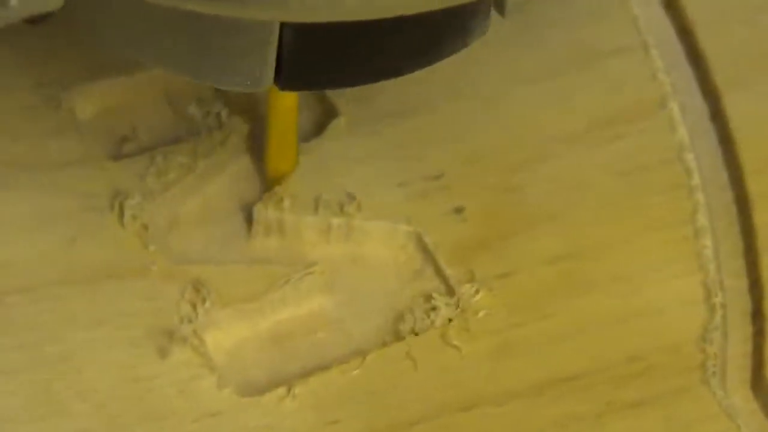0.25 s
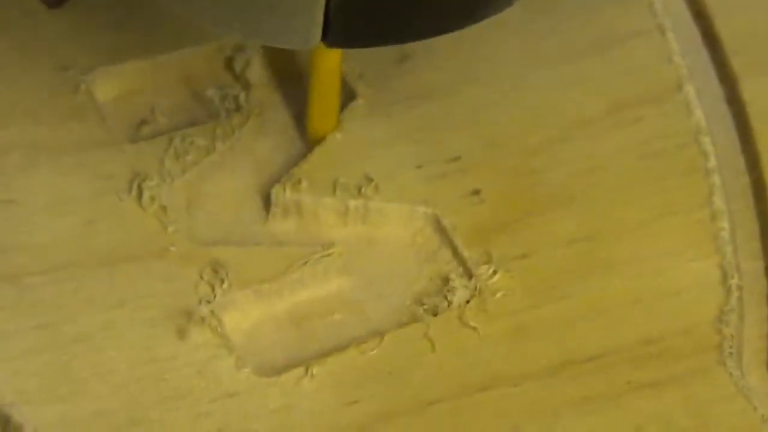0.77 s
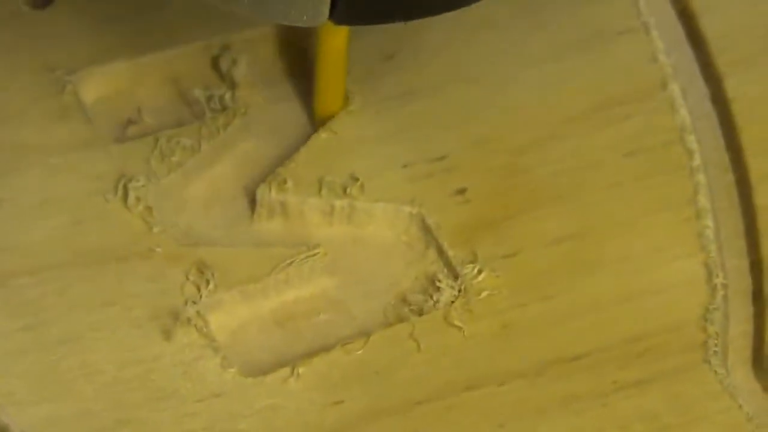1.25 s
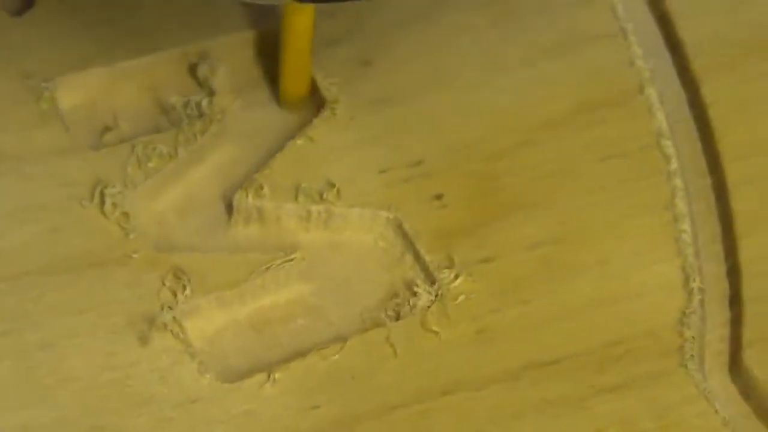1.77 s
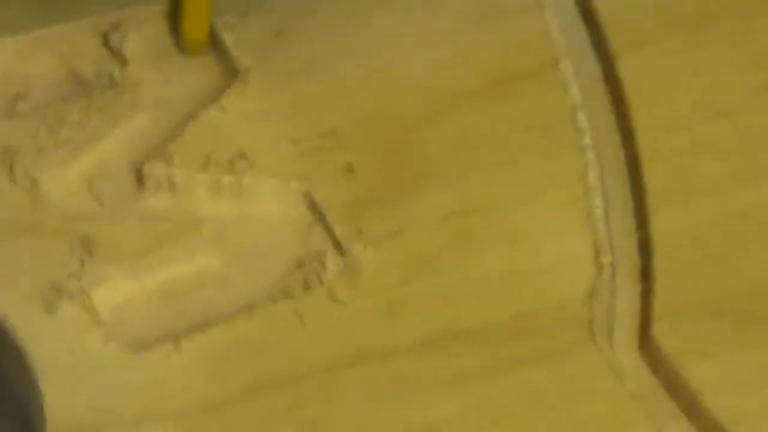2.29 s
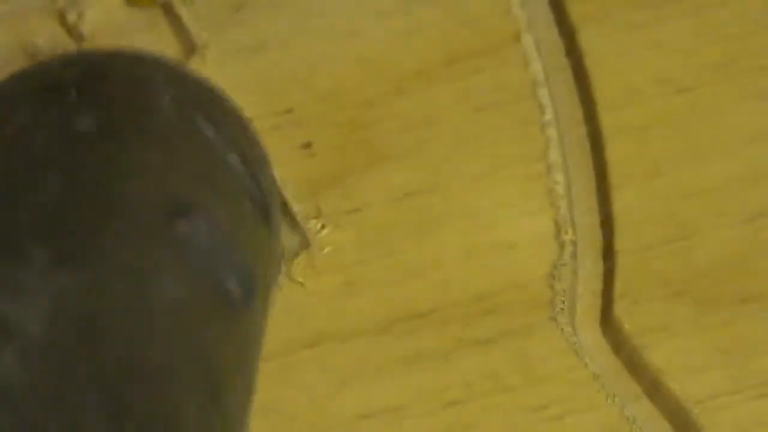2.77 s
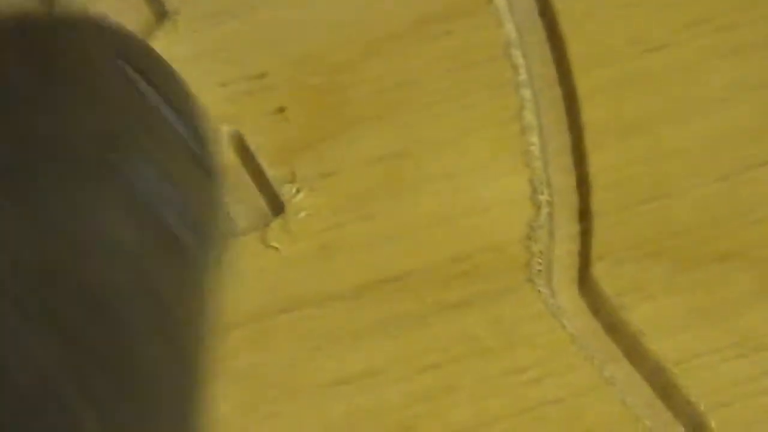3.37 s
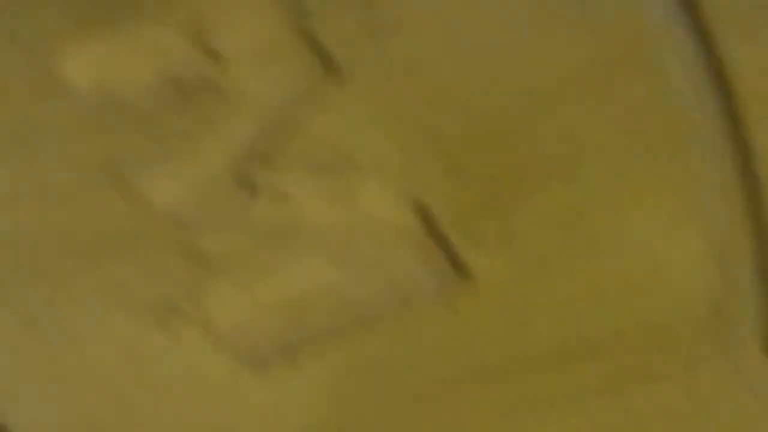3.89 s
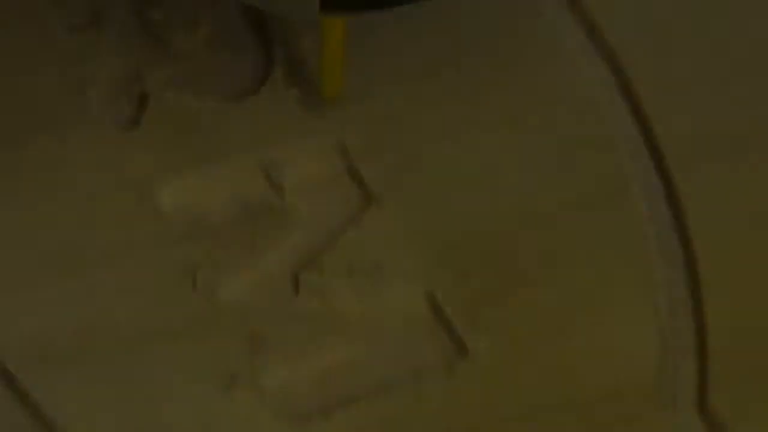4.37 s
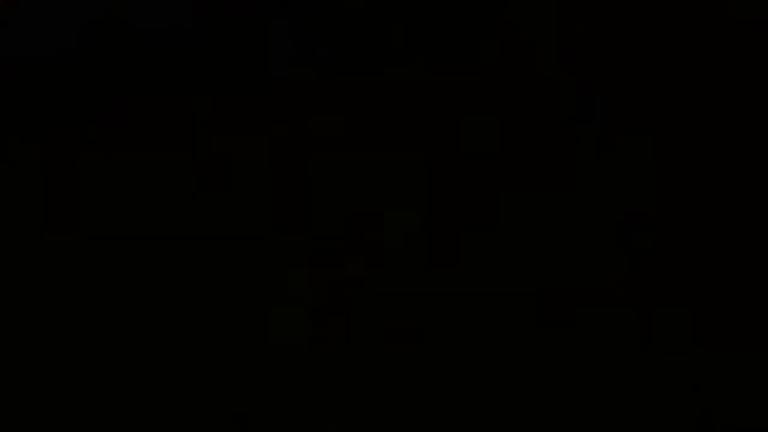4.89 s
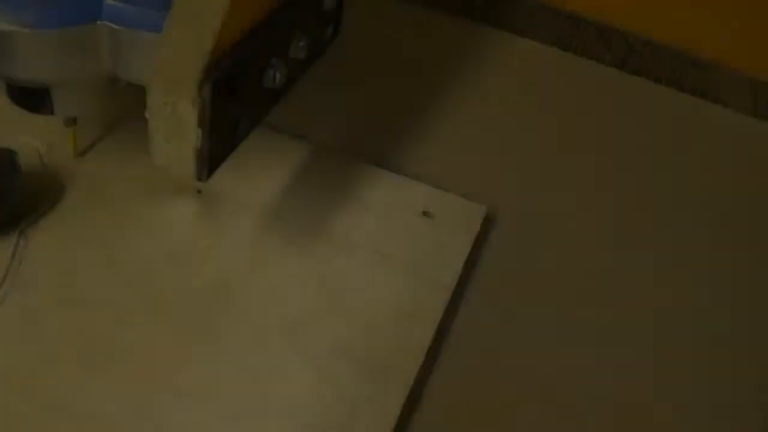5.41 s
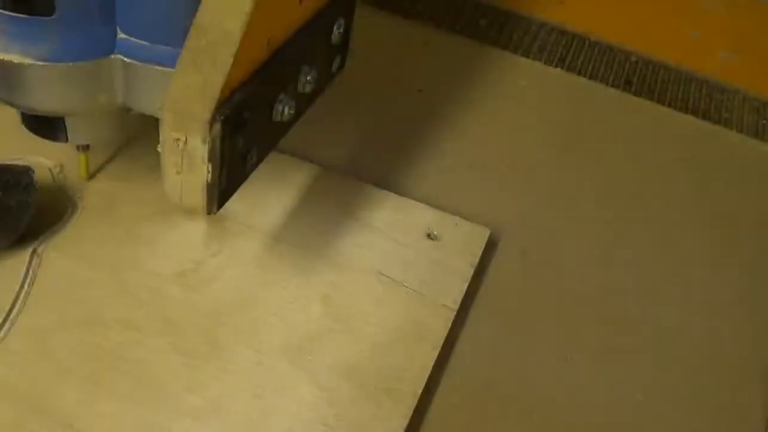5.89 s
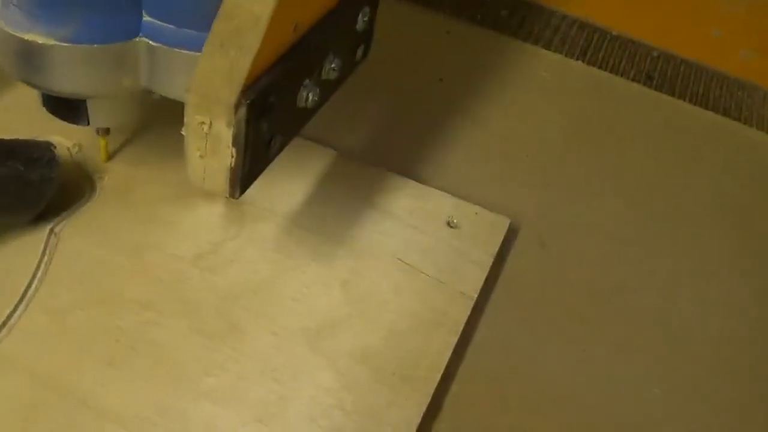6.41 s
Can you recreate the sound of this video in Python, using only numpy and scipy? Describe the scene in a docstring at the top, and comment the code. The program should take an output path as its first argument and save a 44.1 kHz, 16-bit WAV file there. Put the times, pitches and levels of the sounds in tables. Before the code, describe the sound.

Heard up close, a small milling machine carves wood: a high motor whine, a buzzing squeal from the bit and the hiss of suction. The squeal grows rough and uneven, then drops away near the middle while the motor rises slightly in pitch. The whine and hiss fade out briefly, return, and the cutting starts again just before the end.

```python
"""First comes the whine of a router spindle, close to the microphone, its bit already cutting wood on a
small milling table. The motor fan roars and sings at 27 times the shaft speed, the flutes strike out
harmonics of the shaft, and a suction nozzle whistles near the work. The bit chatters after a corner and
lifts out near 3 s; the microphone draws back. All fades to silence at 5 s and returns from a second
microphone position, where the bit meets the wood again."""
import sys
import numpy as np
from scipy import signal
from scipy.io import wavfile
from scipy.ndimage import uniform_filter1d

SR = 44100
rng = np.random.default_rng(int(sys.argv[2]) if len(sys.argv) > 2 else 0)


def wav_out(sig):
    """Save sig, one row per channel (or a flat mono array), as 16-bit PCM at SR to the path in sys.argv[1]."""
    wavfile.write(sys.argv[1], SR, np.round(np.clip(np.atleast_2d(sig).T, -1, 1) * 32767).astype(np.int16))


N = 293250
TIME = np.arange(N) / SR
CORNER_S, CHATTER_END_S = 1.36, 2.5
PULL_BACK_S, MOVE_S = 3.82, 5.006  # the microphone draws back, then takes its second position
SIDE = np.array([[.5], [-.5]])  # splits a left-minus-right difference between the channels


def gain_of(db):
    """Decibels to amplitude."""
    return 10 ** (np.asarray(db) / 20)


def unit_rms(x):
    """Scales to rms 1."""
    return x / np.sqrt(np.mean(abs(x) ** 2) + 1e-20)


def spectrum_at(points, hz):
    """Reads a spectrum on a log-frequency axis."""
    point_hz, value = np.transpose(points)
    return np.interp(np.log(hz + 1), np.log(point_hz + 1), value)


def curves(rows, t=TIME):
    """Every column of a table, interpolated at the times t."""
    times, *columns = np.transpose(rows)
    return [np.interp(t, times, column) for column in columns]


def held(rows, blend_s=0.03):
    """Every column of a table, held from one start to the next and blended at the change."""
    starts, *columns = np.transpose(rows)
    row = np.maximum(np.searchsorted(starts, TIME, "right") - 1, 0)
    return uniform_filter1d(np.array(columns)[:, row], round(blend_s * SR), axis=1, mode="nearest")


def bumps(rows):
    """Sum of flat-topped bumps (time [s], length [s], height)."""
    return sum(height * np.exp(-(2 * (TIME - s) / length) ** 4) for s, length, height in rows)


def wander(hz):
    """Slow random motion up to about hz, rms 1."""
    points = rng.standard_normal(int(N / SR * 200) + 2)
    smooth = signal.lfilter(*signal.butter(2, min(hz, 90), fs=200), points)
    return np.interp(TIME * 200, np.arange(len(points)), unit_rms(smooth))


# Standing waves at the microphone: (frequency [Hz], left minus right [dB], left phase lead [rad])
STANDING_WAVES = [(470, -3, -0.46), (930, 1, 0.65), (1400, -2, -0.82), (2800, 0, 0.098),
                  (3750, -1.5, -0.0044), (4680, -2, 0.81), (5150, -0.5, 0.52), (5570, -0.5, 0.52),
                  (7000, 3, 0.74), (12700, -0.4, -0.31)]


def tone(cycles, db, hz):
    """A sine of rms level db at a swaying hand-held stereo microphone; hz sets its place in the image."""
    wave_hz, lean_db, lead = np.transpose(STANDING_WAVES)
    phase = 2 * np.pi * (cycles + rng.random())
    phase = phase + SIDE * (np.interp(hz, wave_hz, lead) + 0.29 * wander(3.8))
    balance_db = np.interp(hz, wave_hz, lean_db) + 1.3 * wander(1.8)
    return np.sqrt(2) * gain_of(db + SIDE * balance_db) * np.cos(phase)


# The motor at the microphone: (time [s], fan whine [dB], next order up [dB], shaft hum [dB])
MOTOR_LEVELS = [(0.0, -41, -68, -66), (0.375, -37.5, -62, -61), (0.5, -40.5, -65, -63.5),
                (0.65, -36.5, -69, -61), (0.9, -36.5, -69, -60), (1.2, -38.5, -65, -59),
                (1.3, -36, -65, -57), (1.375, -44, -63.5, -64.5), (1.5, -36.5, -64.5, -59),
                (1.7, -43.5, -58, -60.5), (1.9, -47, -58, -63), (1.97, -41, -59, -68),
                (2.05, -35.5, -61, -66), (2.18, -41, -63, -70), (2.3, -39.5, -64, -73),
                (2.55, -32, -60, -73), (2.75, -38, -54, -65), (2.95, -34.5, -62, -60.5),
                (3.3, -33, -71, -59.5), (3.55, -40.5, -57, -53), (3.9, -39.5, -60, -57.5),
                (4.3, -47.5, -53, -57.5), (4.8, -38.5, -52, -58.5), (5.15, -37, -46.5, -54),
                (5.3, -34, -45, -55), (5.6, -33.5, -48, -55), (5.78, -38.5, -42, -54),
                (5.9, -36.5, -45, -58), (6.0, -35, -48, -61), (6.1, -35.5, -47, -55),
                (6.25, -34, -47, -57.5), (6.5, -36, -46.5, -53.5), (6.56, -38, -47, -58),
                (6.65, -41, -47.5, -52)]
# Faint motor tones that never stop: (order [x shaft speed], level [dB])
FAINT_ORDERS = [(3, -60), (21, -62), (22, -62), (23, -63), (24, -62), (25, -61), (26, -61), (29, -68)]
FAN_BLADES = 27
RIPPLE_HZ, RIPPLE_DEPTH = 100, .07  # torque ripple at twice the mains frequency


def motor(turns, shaft_hz):
    """The fan blades whine, shaken by torque ripple, over the hum of the unbalanced shaft."""
    whine_db, upper_db, hum_db = curves(MOTOR_LEVELS)
    blade_hz = FAN_BLADES * shaft_hz
    whine = tone(FAN_BLADES * turns + 0.025 * wander(12), whine_db + 0.8 * wander(40), blade_hz)
    whine *= 1 + RIPPLE_DEPTH * np.cos(2 * np.pi * RIPPLE_HZ * TIME + 1.2 * wander(25))
    upper = tone((FAN_BLADES + 1) * turns, upper_db + 1.5 * wander(12), blade_hz)
    hum = tone(turns, hum_db + 1.1 * wander(11), shaft_hz)
    faint = sum(tone(k * turns, db + 3.4 * wander(2.7), k * shaft_hz) for k, db in FAINT_ORDERS)
    return whine + upper + hum + faint


# Each leg of the tool path meets the wood its own way, in eight registers: (start [s], flute beat [dB],
# board drone [dB], lower ring [dB], 10th order [dB], 11th [dB], bit ring [dB], upper ring [dB], 15th [dB])
PATH_LEGS = [(0.0, -45.5, -47, -42, -63, -48, -40, -54, -50),
             (0.34, -45, -46.5, -45, -49, -46, -42, -40, -46),
             (0.45, -49.5, -46.5, -45, -50, -42, -39, -47, -51),
             (0.66, -47.5, -48, -47, -59, -45, -39, -51, -53),
             (0.98, -48, -47, -45.5, -54, -44, -38, -48, -51),
             (1.2, -47, -46.5, -50, -58, -44.5, -41, -42, -49),
             (1.34, -56.5, -56, -48, -46, -43, -37.5, -37.5, -46),
             (1.45, -59, -47.5, -42.5, -46.5, -50, -41.5, -47, -48),
             (1.64, -59, -47, -44.5, -46.5, -50, -41.5, -44, -46.5),
             (2.0, -58, -47.5, -46, -45.5, -49.5, -42, -48, -50),
             (2.17, -56, -45.5, -43.5, -40, -44, -39.5, -48, -50),
             (2.27, -58, -47.5, -43.5, -45, -40.5, -38.5, -50, -60),
             (2.35, -67, -52, -56, -45, -52, -42, -53, -58),
             (2.41, -61, -45.5, -56, -52, -44, -44, -53, -58),
             (2.48, -65, -48.5, -51, -53, -54, -48, -56, -56),
             (2.6, -67, -52, -51, -43.5, -52, -45, -55, -60),
             (2.68, -65, -58, -60, -60, -62, -52, -62, -66),
             (2.715, -61, -55, -61, -45.5, -47, -41.5, -59, -46),
             (2.8, -58, -50, -57, -45, -50, -50, -62, -62), (2.86, -71, -60, -60, -60, -70, -51, -70, -70),
             (2.97, -66, -56.5, -58, -72, -66, -84, -71, -82),
             (6.09, -62, -67, -64, -60, -52, -49, -50, -61),
             (6.32, -77, -56, -62, -54, -49, -56, -48.5, -60),
             (6.53, -69, -52, -57, -59, -52, -42.5, -41, -55),
             (6.6, -57, -47, -45, -52.5, -51, -51, -48, -58)]
# Harmonics of the cut: (order [x shaft speed], register [index], share along the first edge [dB],
# share after the corner [dB], share at the second position [dB])
CUT_HARMONICS = [(2, 0, 0, 0, 0), (4, 1, -10, -14, -7), (5, 1, -10, -12, -12), (6, 1, -5, -7, -10),
                 (7, 1, -7, -1, -7), (8, 2, -1, -2, -1), (9, 2, -8.5, -4, -6), (10, 3, 0, 0, 0),
                 (11, 4, 0, 0, 0), (12, 5, 0, 0, 0), (13, 6, -11, -8, -9), (14, 6, -7, -6, -2),
                 (15, 7, 0, 0, 0), (16, 6, -11, -12, -12), (17, 6, -12, -14, -10)]
# At turns the contact slips round the bit and the cut sounds flat: (time [s], length [s], rate drop [Hz])
CONTACT_SLIPS = [(1.31, .03, 2), (1.362, .045, 5.2), (1.405, .02, 4), (1.45, .07, 1.5), (6.297, .025, 3.5),
                 (6.553, .04, 3.5)]
# The bit skips or digs in: (time [s], length [s], squeal change before weighting by order [dB])
SKIPS_AND_DIGS = [(.39, .04, -5), (.51, .08, 2.5), (1.2, .02, -5), (1.25, .045, -4), (1.32, .03, -3),
                  (1.475, .012, 4), (1.495, .014, -6), (1.52, .01, -9), (1.54, .025, 2), (1.56, .01, -11),
                  (1.585, .035, 7), (1.61, .008, -9), (1.625, .018, 6), (1.645, .014, -5),
                  (1.695, .016, -7), (1.73, .03, 7), (1.755, .012, -6), (1.765, .01, 3), (1.78, .018, -6),
                  (1.805, .018, 5), (1.83, .02, 3), (1.875, .03, -5), (1.965, .012, -6), (2.0, .025, 4),
                  (2.025, .012, -6), (2.055, .01, -5), (2.08, .02, -6), (2.11, .04, 4), (2.14, .02, -9),
                  (2.165, .03, 4), (2.2, .02, -5), (2.4, .025, -8), (2.49, .025, -4), (2.55, .025, -5),
                  (2.69, .035, -11), (2.76, .03, 2), (6.148, .045, 7), (6.295, .035, 5.5), (6.553, .03, 5)]
# The board sounds the third order, loudest along the first edge: (time [s], level [dB])
BOARD_THIRD = [(0, -47.5), (.42, -47.5), (.47, -55), (.9, -52.5), (1.2, -52), (1.35, -60), (1.5, -56),
               (2.6, -58), (2.75, -53), (2.9, -70), (6.65, -70)]
# Faint tones one ripple frequency below the cut, on the first edge: (order [x shaft speed], level [dB])
RIPPLE_SIDEBANDS = [(12, -58), (14, -60), (16, -59), (17, -60)]


def cutter(turns, shaft_hz):
    """The flutes strike the wood every turn; uneven grain makes them stutter, most after the corner."""
    register_db, slip_hz, bite_db = held(PATH_LEGS), bumps(CONTACT_SLIPS), bumps(SKIPS_AND_DIGS)
    strikes = turns - np.cumsum(slip_hz) / SR
    strikes += (.0015 + .002 * slip_hz) * wander(85)  # each chip breaks a little early or late
    past_corner = np.clip((TIME - CORNER_S) / 0.082 + .5, 0, 1)
    chatter = past_corner * np.clip((CHATTER_END_S - TIME) / .2, 0, 1)
    grain = wander(33)  # all orders feel the same fibres
    cut = tone(3 * strikes, curves(BOARD_THIRD)[0] + .7 * grain, 3 * shaft_hz)
    cut += (1 - past_corner) * sum(tone(k * turns - RIPPLE_HZ * TIME, db + 2.5 * grain, k * shaft_hz)
                                   for k, db in RIPPLE_SIDEBANDS)
    for k, register, first_db, later_db, second_db in CUT_HARMONICS:
        share_db = np.where(TIME > MOVE_S, second_db, first_db + past_corner * (later_db - first_db))
        share_db += bite_db * .85 * np.exp(-((k - 12) / 2.5) ** 2)  # the bit's ring feels bites most
        fibres = np.minimum(.6 * grain + .8 * wander(35), .6)  # capped: drop-outs, no bursts
        stutter_db = min(k / 8, 1) * ((1 + 1.4 * chatter) * fibres + .6 * wander(85)) + .3
        level_db = register_db[int(register)] + share_db + stutter_db
        cut += tone(k * strikes + 0.012 * wander(33), level_db, k * shaft_hz)
    return cut


# Hollow bands that table, frame and walls give the air:
# (centre [Hz], width [Hz], close up [dB], drawn back [dB], at the second position [dB])
ROOM_BANDS = [(870, 46, -0.5, -4, 5), (1360, 260, 4, 2, 2.5), (2036, 113, 0, 1.5, 6),
              (2900, 340, 2.5, 4.5, 1.5), (3280, 90, 0, -1, 4), (4660, 1200, 1.5, -0.5, 1),
              (5050, 81, 4, 2, -4), (6440, 56, 1, 8.5, 5.5), (8400, 220, -2, -1, -1),
              (10400, 560, -0.5, 2.5, 0.5), (12400, 350, 0, 3, 2), (11500, 360, -1, -2, -2)]
# Bass at the microphone, below about 350 Hz: (time [s], level over the roar [dB])
BASS_LIFT = [(0, 3.5), (1.0, 1), (1.5, -1), (2.9, -1), (3.5, -6.5), (4.4, 0.5), (5.0, -9), (5.01, 4),
             (6.0, 3.5), (6.65, 6.5)]


def room_colour_db(t, hz):
    """Nearby surfaces colour the rush of air differently wherever the microphone stands."""
    drawn_back = np.clip((t - PULL_BACK_S) / 0.44 + .5, 0, 1)
    colour_db = curves(BASS_LIFT, t)[0] * np.clip(np.log2(400 / (hz + 1)) / 0.21, 0, 1)
    for centre_hz, width_hz, close_db, back_db, second_db in ROOM_BANDS:
        band_db = np.where(t > MOVE_S, second_db, close_db + drawn_back * (back_db - close_db))
        colour_db += band_db * np.exp(-((hz - centre_hz) / width_hz) ** 2)
    return colour_db


# Strength of the moving air: (time [s], low roar [relative dB], high hiss [relative dB])
AIR_LEVELS = [(0.0, -39.5, -40), (0.4, -39.5, -40), (0.5, -41.5, -43.5), (1.13, -40.5, -41.5),
              (1.25, -40.5, -42), (1.345, -41, -41), (1.365, -46, -46.5), (1.41, -45, -45.5),
              (1.46, -42, -41.5), (1.55, -40.5, -40.5), (2.13, -40.5, -41), (2.25, -41.5, -41),
              (2.4, -38.5, -40.5), (2.55, -39.5, -41), (2.8, -38.5, -41), (3.05, -39.5, -41.5),
              (3.3, -40, -41), (3.42, -39, -41.5), (3.55, -34, -38), (3.66, -35, -39), (3.79, -34.5, -38.5),
              (3.86, -38, -41), (4.05, -39, -42.5), (4.8, -40, -41.5), (5.15, -37, -39), (5.3, -40, -41),
              (5.8, -37, -39), (6.27, -42, -43), (6.4, -39.5, -41), (6.53, -41.5, -42),
              (6.65, -38.5, -38.5)]
# Spectrum of the moving air: (frequency [Hz], density [relative dB])
AIR_SPECTRUM = [(40, -58), (120, -50), (200, -50), (400, -32.5), (520, -27), (800, -19), (1400, -18.5),
                (2200, -19.5), (3000, -19.5), (3800, -16), (5600, -15), (7200, -18), (9000, -14.5),
                (11000, -17), (12000, -21), (13300, -21), (13900, -25), (15000, -33), (15700, -73)]
# How alike the air sounds on both sides of the microphone: (frequency [Hz], correlation [0-1])
AIR_COHERENCE = [(60, 0.6), (180, 0.79), (550, 0.83), (1650, 0.94), (4970, 0.76), (15000, 0.77)]
# Where the air sits in the stereo image: (frequency [Hz], left minus right [dB])
AIR_BALANCE = [(60, 0), (150, 4), (380, -3), (950, -0.5), (2380, -0.5), (5980, 0.5), (9000, 2),
               (15000, -2.5)]
# Whistle of the nozzle mouth: (time [s], level over the air [dB])
NOZZLE_WHISTLE = [(0, 7), (.3, 3), (3.3, 5), (3.6, 10), (3.85, 0), (4.0, 13.5), (4.6, 11), (5.0, 8),
                  (5.9, 2), (6.2, -8), (6.5, -6), (6.65, 10)]
NOZZLE_HZ, NOZZLE_WIDTH_HZ = 7910, 110


def air_rush(turns):
    """Fan and suction drive a broad rush with the nozzle's whistle in it, pulsing once a shaft turn."""
    frames, hz = N // 128 + 5, np.fft.rfftfreq(512, 1 / SR)[:, None]
    t = np.arange(frames) * 128 / SR
    left_re, left_im, apart_re, apart_im, patches = rng.standard_normal((frames, 257, 5)).T
    patches = unit_rms(uniform_filter1d(uniform_filter1d(patches, 8, 0), 25, 1))
    gusts = unit_rms(uniform_filter1d(rng.standard_normal(frames), 20))
    flutter_db = 0.81 * patches + 0.7 * gusts
    roar_db, hiss_db = curves(AIR_LEVELS, t)
    hiss_share = np.clip(np.log2((hz + 1) / 3300) / 0.54, 0, 1)
    level = gain_of(roar_db + hiss_share * (hiss_db - roar_db) + room_colour_db(t, hz) + flutter_db + 5)
    whistle = gain_of(curves(NOZZLE_WHISTLE, t)[0]) * np.exp(-((hz - NOZZLE_HZ) / NOZZLE_WIDTH_HZ) ** 2)
    coherence = spectrum_at(AIR_COHERENCE, hz)
    left = left_re + 1j * left_im
    right = coherence * left + np.sqrt(1 - coherence ** 2) * (apart_re + 1j * apart_im)
    noise = np.array([left, right]) * gain_of(SIDE[:, None] * spectrum_at(AIR_BALANCE, hz))
    colour = gain_of(spectrum_at(AIR_SPECTRUM, hz))
    spectra = noise * colour / np.linalg.norm(colour) * level * np.hypot(1, whistle)
    rush = signal.istft(spectra, nperseg=512, noverlap=384)[1][:, :N]
    return rush * (1 + 0.12 * np.cos(2 * np.pi * turns))


def bass_dropouts(rush):
    """Random drop-outs, like an audio coder's, in the faint low rumble; it also dips around the fade."""
    lowpass = signal.butter(4, 170, fs=SR, output="sos")
    rumble = signal.sosfiltfilt(lowpass, rush, padtype="even", padlen=4000)
    dip_db = 12 * np.exp(-((TIME - MOVE_S) / .6) ** 2)
    rumble_db = 11 * np.minimum(wander(7), .6) - 3 - dip_db
    return rush + rumble * (gain_of(rumble_db) - 1)


# The suction motor's tone, high in the hiss: (time [s], pitch [Hz], level [dB])
VACUUM_MOTOR_TONE = [(0, 8760, -60), (.66, 8712, -56), (1.4, 8715, -58), (1.93, 8770, -60),
                     (2.52, 8805, -53), (2.94, 8868, -51), (3.36, 8912, -53), (3.9, 8918, -58),
                     (5.0, 8918, -58), (5.46, 8913, -53), (6.3, 8882, -51), (6.65, 8862, -56)]


def vacuum_whine():
    """The suction motor's thin, fuzzy high whine, drifting at its own speed."""
    hz, db = curves(VACUUM_MOTOR_TONE)
    return tone(np.cumsum(hz) / SR + 0.06 * wander(30), db + 2.1 * wander(22), hz.mean())


# The load drags the shaft down; it recovers as the bit leaves the wood: (time [s], shaft speed [Hz])
SHAFT_SPEED = [(0.0, 468.85), (0.375, 468.13), (0.65, 466.85), (0.9, 466.9), (1.17, 467.14), (1.39, 466.74),
               (1.6, 467.35), (2.0, 468.75), (2.4, 469.87), (2.75, 472.01), (3.2, 474.13), (3.5, 475.02),
               (3.75, 475.36), (5.0, 475.36), (5.01, 474.58), (5.8, 474.53), (6.15, 473.63), (6.65, 472.81)]


def scene():
    """At close range: one shaft times motor, cut and the pulsing air; the vacuum whines on its own."""
    speed_hz = curves(SHAFT_SPEED)[0]
    turns, mean_hz = np.cumsum(speed_hz) / SR, speed_hz.mean()
    spindle = motor(turns, mean_hz) + cutter(turns, mean_hz)
    return spindle + bass_dropouts(air_rush(turns)) + vacuum_whine()


FADE_S, BAND_LIMIT_HZ = 1.0, 15800
SECOND_BALANCE_DB = 0.95  # from the second position the machine stands further left


def record(dry):
    """A straight fade out and in across the change of microphone position, then the band limit."""
    moved = dry * gain_of(SIDE * SECOND_BALANCE_DB * (TIME > MOVE_S))
    faded = moved * np.clip(abs(TIME - MOVE_S) / FADE_S, 0, 1)
    lowpass = signal.firwin(511, BAND_LIMIT_HZ, window=("kaiser", 9), fs=SR)
    return signal.oaconvolve(faded, lowpass[None], "same")


dry = scene()
out = record(dry)
wav_out(out)
```